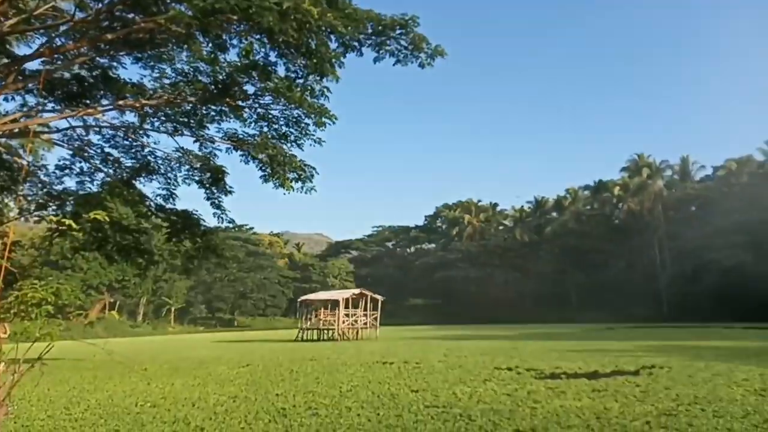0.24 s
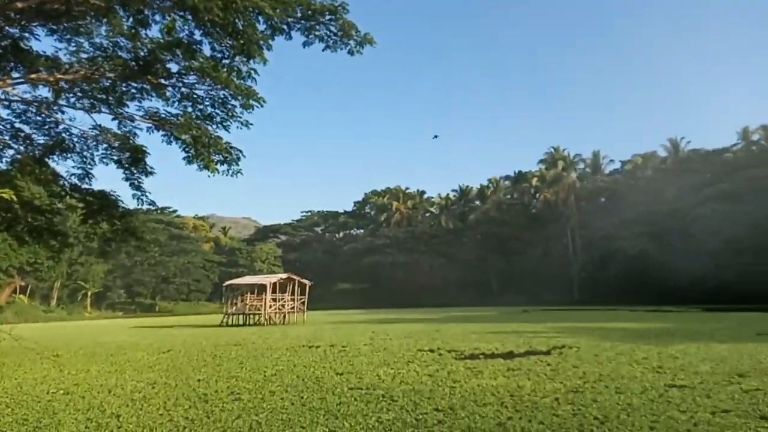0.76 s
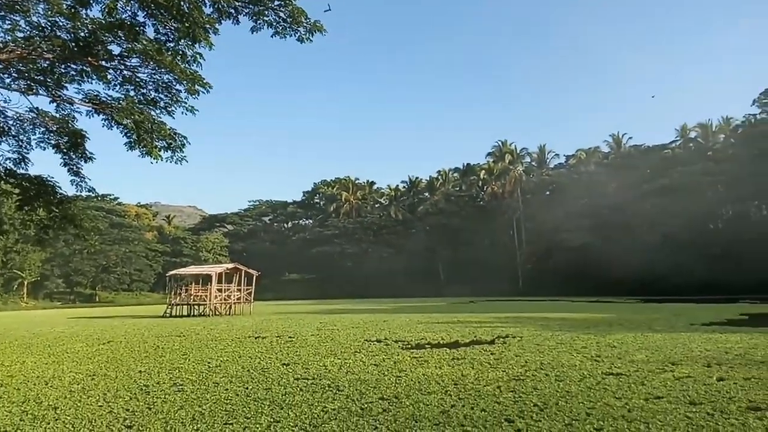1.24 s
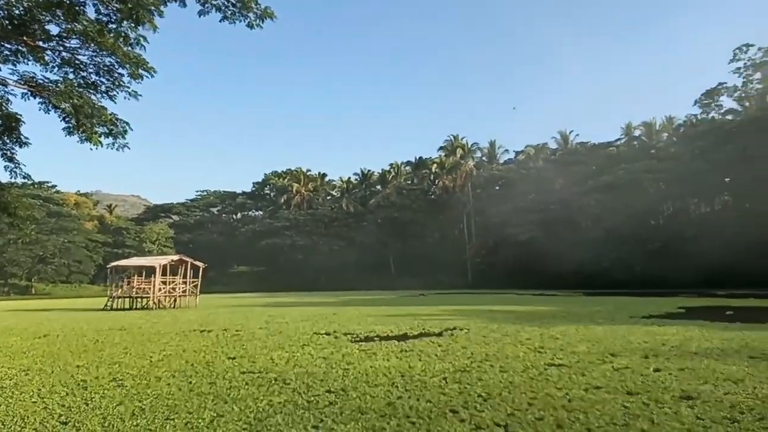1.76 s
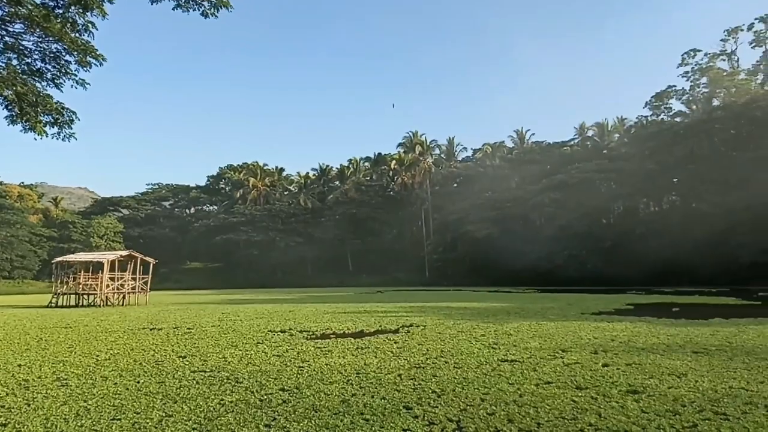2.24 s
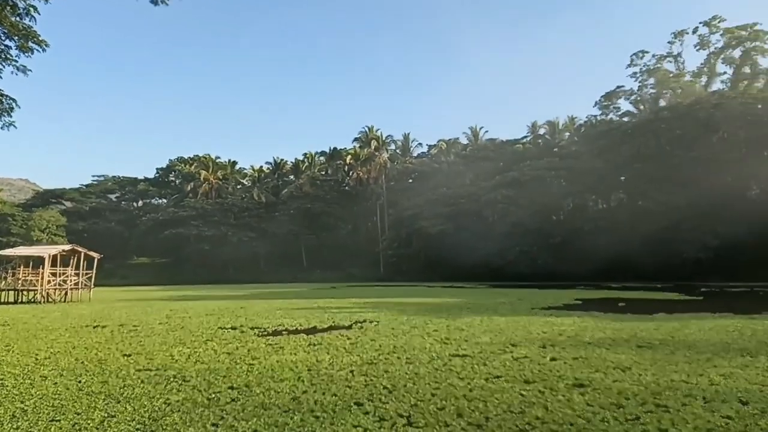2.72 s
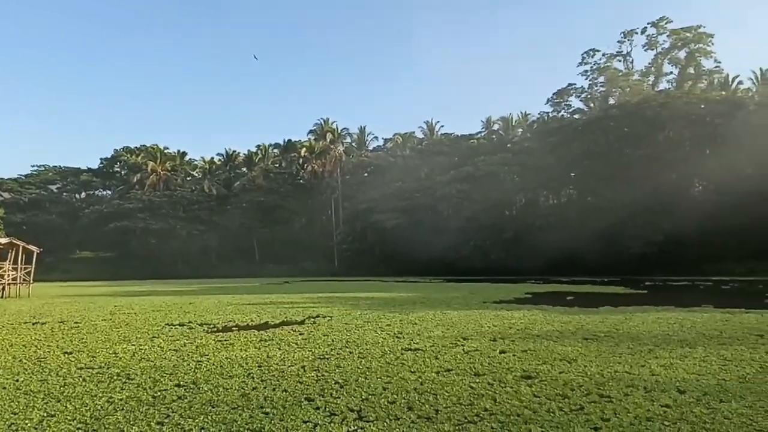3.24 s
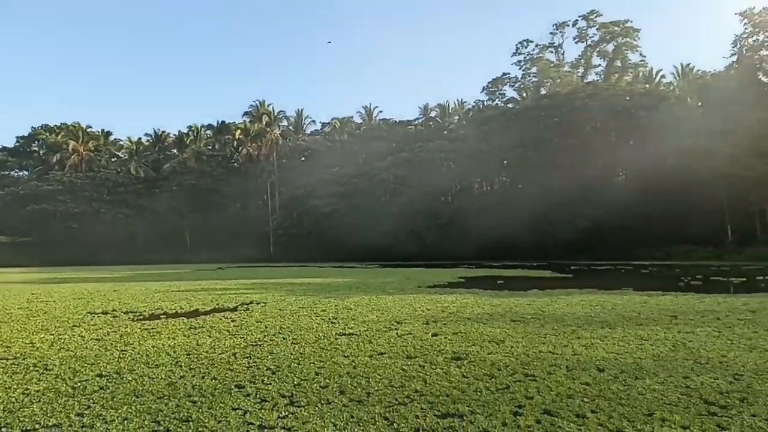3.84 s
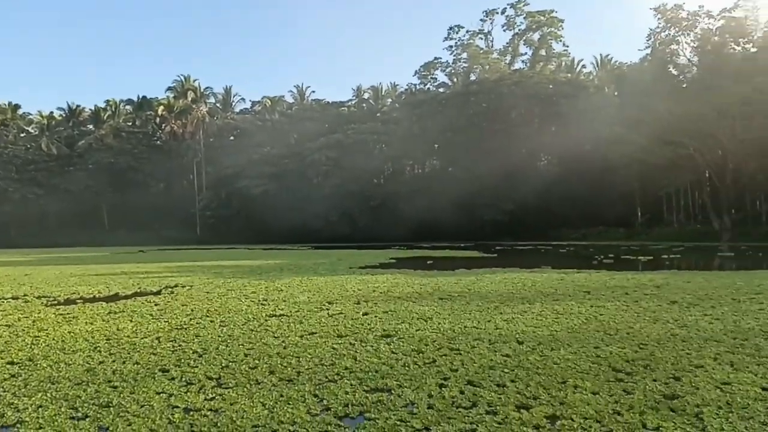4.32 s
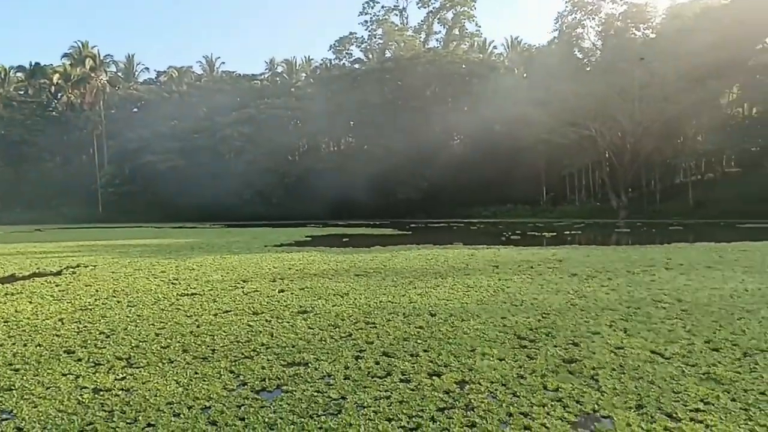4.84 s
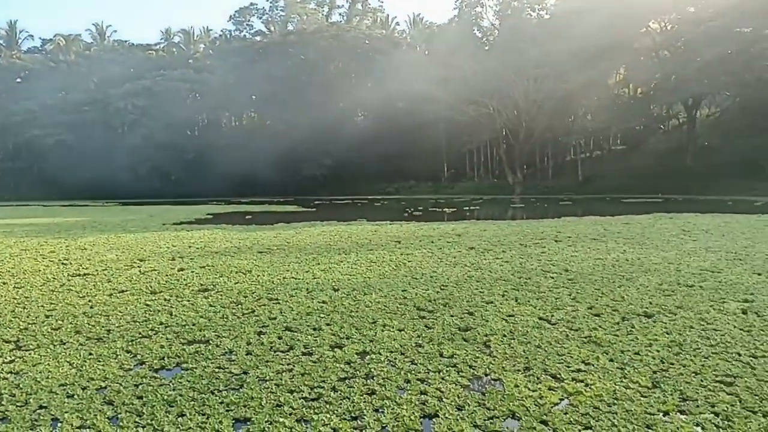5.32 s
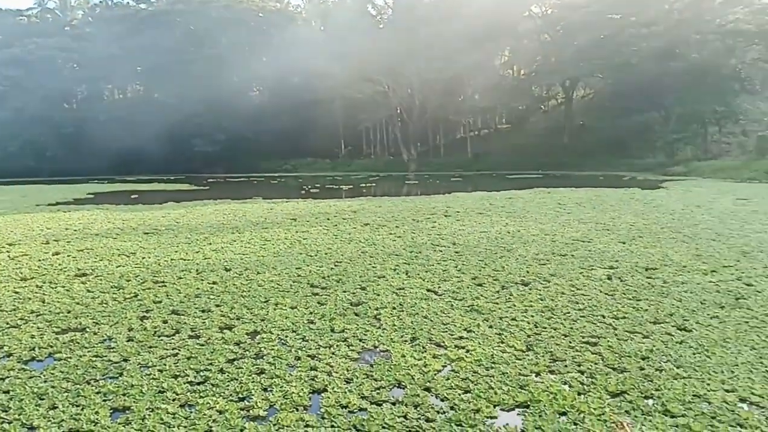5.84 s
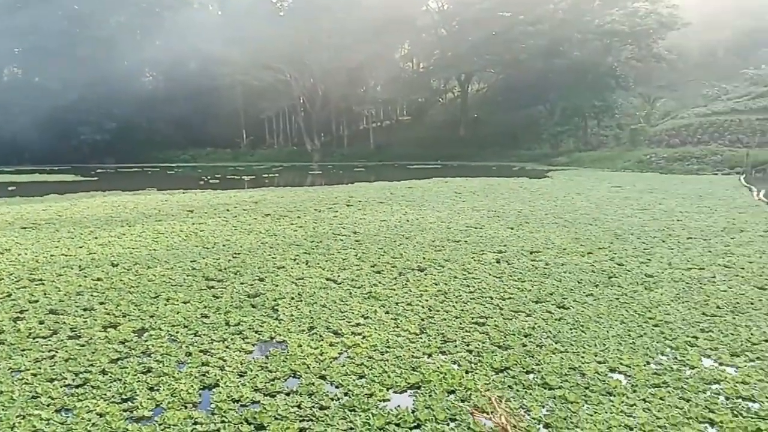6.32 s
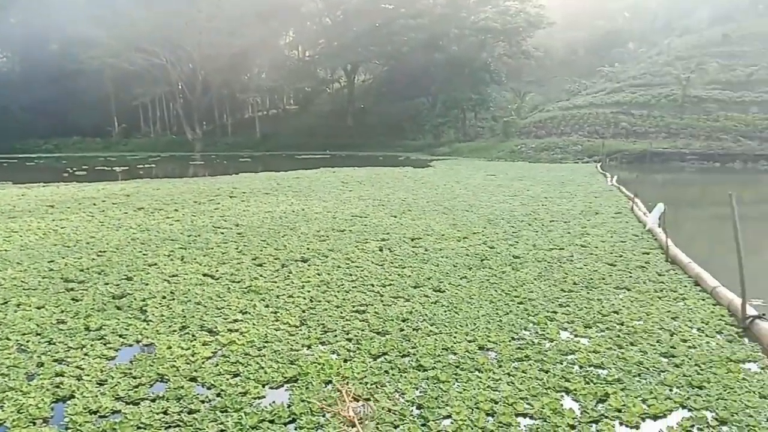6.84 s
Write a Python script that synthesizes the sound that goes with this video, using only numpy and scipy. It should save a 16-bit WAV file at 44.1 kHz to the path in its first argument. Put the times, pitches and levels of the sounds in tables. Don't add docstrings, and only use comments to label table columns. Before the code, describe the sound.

Hollow steps on loose wooden slats for nearly three seconds, then chirping birds, soft clucks, a sharp stick crack and far roosters crowing.

```python
import sys
import numpy as np
from scipy import signal
from scipy.io import wavfile
from scipy.ndimage import uniform_filter1d

SR = 44100
rng = np.random.default_rng(int(sys.argv[2]) if len(sys.argv) > 2 else 0)


def store_wav(level_fs):
    pcm = np.round(np.clip(np.atleast_2d(level_fs), -1, 1) * 32767)
    wavfile.write(sys.argv[1], SR, pcm.T.astype(np.int16))


def ratio(d):
    e = np.asarray(d, float) / 20
    return 10 ** e


N = 311787
DECK_S = 3.5


def evened(x):
    return x / np.sqrt(np.mean(x ** 2) + 1e-20)


def read(points, hz):
    f, value = np.transpose(points)
    return np.interp(np.log(hz + 1), np.log(f + 1), value)


def curve(rows, column=1):
    rows = np.array(rows)
    return np.interp(np.arange(N) / SR, rows[:, 0], rows[:, column])


def add(mix, s, sound):
    at = round(s * SR)
    part = mix[max(at, 0):max(at + len(sound), 0)]
    part += sound[max(-at, 0):][:len(part)]


def resonate(x, hz, width):
    r = np.exp(-np.pi * width / SR)
    return 2 * signal.lfilter([1 - r], [1, -r * np.exp(2j * np.pi * hz / SR)], x).real


def band(x, hz, width):
    return resonate(resonate(x, hz, width), hz, width)


def wander(count, span_s):
    size = max(int(span_s * SR), 2)
    smooth = uniform_filter1d(rng.standard_normal(count), size)
    return evened(uniform_filter1d(smooth, size))


def causal(points):
    level_db = np.maximum(read(points, abs(np.fft.fftfreq(4096, 1 / SR))), -90)
    log_gain = np.log(ratio(level_db))
    return np.fft.ifft(np.exp(np.conj(signal.hilbert(log_gain)))).real[:1024]


def trees(x, t60):
    t = np.arange(SR // 2) / SR
    signs = rng.choice([-1., 1.], len(t))
    sparse = rng.random(len(t)) < .05
    echoes = signs * sparse * ratio(-60 * t / t60) * (t > .008)
    return signal.oaconvolve(x, echoes / np.linalg.norm(echoes))[:N]


def whistles(rows, flutter_db, waver, edge, waver_s=0.0046):
    out = np.zeros(N)
    flutter = wander(N + SR, 0.0045)
    drift = wander(N + SR, waver_s)
    for k, (s, length, *hz, db) in enumerate(rows):
        u = np.linspace(0, 1, int(length * SR))
        start = k * 7919 % N
        own = slice(start, start + len(u))
        bend = hz[0] * (1 - u) * (1 - 2 * u) + 4 * hz[1] * u * (1 - u) + hz[2] * u * (2 * u - 1)
        pitch = bend * (1 + waver * drift[own])
        shape = signal.windows.tukey(len(u), np.clip(edge, 0, 1)) * ratio(db + flutter_db * flutter[own])
        add(out, s, np.sqrt(2) * shape * np.sin(2 * np.pi * np.cumsum(pitch) / SR))
    return out


def arched(rows, depth):
    return [(s, n, hz * (1 - depth), hz, hz * (1 - depth), db) for s, n, hz, db in rows]


# (frequency [Hz], level per Hz [dB])
AIR_COLOUR = [(15, -34), (25, -9), (38, -12), (110, -1.5), (305, -13.5), (1020, -15.5), (1410, -8),
              (2060, -3), (4730, -10), (6190, -27.5), (7280, -8), (8100, -16), (10000, -20.5),
              (11500, -36.5), (15400, -35.5)]
# (time [s], level [dB])
FARM_MURMUR = [(0, -1), (.5, -0.5), (.9, -0.5), (1.3, -3.5), (1.75, -6), (2.1, 2), (2.28, -7), (2.55, -4),
               (2.9, 1.5), (3.4, -0.5), (4.1, -1.5), (4.7, -3), (5.3, 1), (5.6, 1.5), (6.1, 0.5), (6.6, 4),
               (7.07, 4.5)]


def air():
    patchy_db, murmur_hz, murmur_octaves = 3.2, 850, 1.3
    a, b, patches = rng.standard_normal((N // 256 + 5, 513, 3)).T
    patches = uniform_filter1d(patches, size=10, axis=0)
    patches = evened(uniform_filter1d(patches, size=14, axis=1))
    hz = np.fft.rfftfreq(1024, 1 / SR)[:, None]
    swell_db = np.interp(np.arange(a.shape[1]) * 256 / SR, *np.transpose(FARM_MURMUR))
    murmur_db = np.exp(-(np.log2((hz + 1) / murmur_hz) / murmur_octaves) ** 2) * swell_db
    patch_db = patchy_db * patches / (1 + (hz / 4000) ** 2)
    z = (a + 1j * b) * ratio(read(AIR_COLOUR, hz) + murmur_db + patch_db)
    return ratio(-62.5) * evened(signal.istft(z, nperseg=1024, noverlap=768)[1][:N])


# (time [s], level [dB], extra level of its high voices [dB])
FLOCK_LEVELS = [(0.0, -69, 5), (0.39, -62, 4.5), (0.94, -65, 0.5), (2.24, -61, 0.5), (2.81, -55, 7),
                (2.97, -58, 3), (3.17, -68.5, 11), (3.62, -63.5, -18), (3.96, -63.5, -4),
                (4.19, -53.5, -0.5), (4.53, -62, 11.5), (4.98, -60, -5), (5.57, -55.5, -3),
                (5.93, -60, -2.3), (7.07, -50.5, -10.5)]
# (frequency [Hz], level per Hz [dB])
FLOCK_VOICES = [(650, -48), (1100, -23), (1400, -13), (2070, 2.5), (3070, 1.5), (4050, -2), (4750, -17),
                (5200, -30), (6760, -47), (11400, -120)]


def flock():
    s, length, place, bend, size = rng.random((1100, 5)).T
    hz = 1350 * (4200 / 1350) ** place
    high_db = curve(FLOCK_LEVELS, column=2)[(s * N).astype(int)] * (2 * place - 1)
    db = read(FLOCK_VOICES, hz) + high_db + 4 * size
    first_hz = hz * (1.08 - 0.1603 * bend)
    last_hz = hz * (.92 + 0.158 * bend)
    rows = np.transpose([s * N / SR, .025 + .07 * length ** 2, first_hz, hz, last_hz, db])
    notes = whistles(rows, flutter_db=6, waver=0.0097, edge=0.44)
    return ratio(curve(FLOCK_LEVELS) - 2) * evened(.15 * notes + trees(notes, .6))


# (time [s], length [s], middle pitch [Hz], level [dB])
RISING_NOTES = [(.04, 0.065, 2800, -65), (0.109, .09, 3060, -63), (0.236, 0.083, 3210, -65.5),
                (0.403, .08, 2620, -68), (0.476, .1, 2800, -58.5), (.6, .13, 1150, -77),
                (2.82, .15, 1240, -71.5), (2.802, .18, 3056, -54.5), (4.954, .26, 3103, -58),
                (5.25, 0.26, 2700, -59), (6.973, 0.09, 3290, -62)]
# (time [s], length [s], middle pitch [Hz], fall [Hz], level [dB])
FALLING_NOTES = [(-.01, 0.062, 1547, 180, -61), (0.274, 0.095, 1760, 490, -59.5),
                 (0.371, 0.15, 1323, 362, -69), (.935, .07, 3990, 300, -63), (1.117, .07, 3580, 300, -66),
                 (1.2, .075, 3620, 250, -62), (1.29, .06, 2650, 350, -63), (1.349, .1, 2330, 250, -67),
                 (1.8, .12, 2570, 80, -63.5), (1.799, 0.11, 3430, 100, -70), (2.53, 0.062, 3520, 150, -62),
                 (1.554, 0.098, 1750, 230, -66.5), (2.86, .19, 3670, 110, -54.5),
                 (3.42, .05, 1890, 80, -66), (3.465, .14, 1739, 200, -58), (3.598, 0.072, 1530, 150, -64),
                 (3.67, 0.064, 3080, 250, -63.5), (3.845, 0.13, 1740, 110, -64.5),
                 (4.059, 0.16, 2790, 210, -64), (4.741, 0.064, 3480, 201, -60.5),
                 (4.8, .09, 3300, 100, -67), (4.929, .1, 1600, 120, -67.5), (5.44, .12, 1350, 300, -66),
                 (5.481, 0.069, 1653, 252, -60), (6.282, 0.08, 1650, 230, -63.5),
                 (6.816, 0.082, 1790, 130.3, -54.5)]
# (time [s], length [s], pitch
# [Hz], level [dB])
HELD_NOTES = [(.811, .135, 4150, -62), (1.047, 0.058, 2960, -64.5), (1.4, .05, 3550, -67),
              (1.355, 0.045, 3760, -67), (1.17, .1, 3080, -74), (4.66, 0.083, 3660, -64.5),
              (1.59, 0.213, 2660, -62), (1.56, .24, 3540, -69.5), (1.64, 0.24, 1760, -68.5),
              (2.02, .17, 3080, -68), (1.958, 0.19, 3670, -62), (2.007, 0.176, 4310, -71.5),
              (2.465, .065, 3680, -66), (3.92, .049, 2960, -65.5), (4.29, 0.083, 3220, -57.5),
              (5.52, 0.11, 2290, -64), (5.522, .12, 2600, -57.5), (6.393, 0.2, 3620, -71),
              (4.385, .06, 3230, -67), (1.31, .07, 4430, -69)]


def songs():
    rise_hz_per_s, bow, sag = 1550, 0.0123, 0.012
    notes = []
    for s, n, hz, db in RISING_NOTES:
        half_rise = rise_hz_per_s * n / 2
        notes.append((s, n, hz * (1 - bow) - half_rise, hz, hz * (1 - bow) + half_rise, db))
    for s, n, hz, fall, db in FALLING_NOTES:
        notes.append((s, n, hz + fall / 2, hz, hz - fall / 2, db))
    for s, n, hz, db in HELD_NOTES:
        notes.append((s, n, hz, hz, hz * (1 - sag), db))
    return whistles(notes, flutter_db=2.6, waver=.004, edge=.3)


# (time [s], level [dB])
CRICKET_TRIPLETS = [(2.971, -67), (3.217, -67), (3.458, -65), (3.702, -65.5), (5.63, -72), (5.879, -66),
                    (6.124, -64.5), (6.366, -67.5), (6.607, -64), (6.883, -62)]
# ((pitch [Hz], width [Hz], pulse rate [1/s]), [(time [s], length [s], level [dB]), ..])
INSECT_TRILLS = [
    ((9240, 120, 68), [(.42, 0.41, -84), (1.45, 0.38, -82.5), (2.33, 0.44, -83.5), (3.3, 0.45, -87), (4.27, .4, -76.5), (5.25, .4, -81.5), (6.1, 0.51, -82)]),
    ((10100, 330, 90), [(4.55, 0.89, -83.5), (6.3, 1, -80.5)]),
    ((10850, 150, 80), [(4.85, 1.1, -93)]),
    ((8600, 200, 16), [(2.9, 2, -84.5)]),
    ((7260, 350, 32), [(0.00065, 6.4, -79.5)]),
    ((4810, 310, 90), [(0.001, 7.1, -82.5)]),
]


def crickets():
    gap_s = .0352
    rows = [(s + k * gap_s, .018, 4750, 4480, 4150, db) for s, db in CRICKET_TRIPLETS for k in range(3)]
    out = whistles(rows, flutter_db=-2.5, waver=0.0046, edge=0.93)
    for (hz, width, rate), trills in INSECT_TRILLS:
        for s, length, db in trills:
            t = np.arange(int(length * SR)) / SR
            beat = np.pi * rate * t + 0.31 * wander(len(t), 0.098)
            strokes = np.maximum(np.sin(beat) ** 2 - .2, 0)
            wing = band(rng.standard_normal(len(t)), hz, width)
            fade = signal.windows.tukey(len(t), min(0.18 / length, 1))
            add(out, s, ratio(db) * evened(strokes * wing) * fade)
    return out


# (time [s], width [s], level [dB])
BREEZE_GUSTS = [
    (.15, 0.19, -68),
    (.87, .1, -62.5),
    (1.5, 0.14, -64),
    (2.2, 0.24, -68),
    (2.9, 0.13, -68),
    (5.7, 0.38, -70),
    (6.88, 0.14, -64.5),
]


def breeze():
    low = band(rng.standard_normal(N), 104.7, 82)
    t = np.arange(N) / SR
    calm = ratio(-78.5)
    gusts = calm + sum(ratio(db) * np.exp(-((t - s) / width) ** 2) for s, width, db in BREEZE_GUSTS)
    return gusts * ratio(3.5 * wander(N, .04)) * evened(low)


# (time [s], peak level [dB], pitch [Hz], time to fall 60 dB [s])
DECK_THUMPS = [(.133, -40.5, 93.2, 0.57), (.135, -37.5, 269.6, 0.31), (.141, -45.5, 176.8, 0.64),
               (.269, -50.5, 111, 0.44), (.741, -42, 150, 0.46), (.745, -37, 234, 0.22),
               (0.759, -50, 420, 0.25), (1.145, -31, 179.7, 0.26), (1.15, -37, 92, 0.4),
               (1.15, -42.5, 320, 0.27), (1.345, -39, 175, 0.23), (1.345, -44.5, 90, 0.43),
               (2.0, -40, 217.4, 0.5), (2.01, -48, 397, 0.48), (2.38, -54, 340, 0.36),
               (2.42, -52.5, 128, .23), (2.685, -43, 396, 0.27)]


def thumps():
    out, t = np.zeros(N), np.arange(SR // 2) / SR
    swell = np.sin(np.pi / 2 * np.minimum(t / .011, 1)) ** 2
    for s, db, hz, t60 in DECK_THUMPS:
        share = np.clip(0.57 - 0.04 * (db + 42) + .12 * np.log2(hz / 180), 0, 1)
        shaken = band(rng.standard_normal(len(t)), hz, 1.45 * hz)
        shaken = evened(band(shaken, hz, 1.45 * hz))
        clean = np.sqrt(2) * np.sin(2 * np.pi * hz * t)
        tone = (1 - share) * clean + share * shaken
        add(out, s, ratio(db - 60 * t / t60) * swell * tone)
    return out


# (time [s], peak level [dB], pitch [Hz])
SLAT_TAPS = [(.144, -41, 1900), (.1512, -40.5, 2110), (.1544, -40, 1880), (.7502, -46, 1880),
             (.7769, -42, 1710), (.7845, -42, 1760), (.7894, -40, 2150), (.7941, -39, 1760),
             (.7972, -38, 1770), (.8058, -43, 1920), (.9689, -49, 2510), (.9719, -48, 2760),
             (.9798, -49, 2270), (1.158, -50, 1000), (1.4539, -44, 2130), (1.4573, -41, 2000),
             (1.535, -50.5, 1050), (1.5407, -47, 2090), (1.8034, -44, 2130), (1.8104, -42, 2350),
             (1.8138, -43, 1950), (1.8196, -43, 2070), (1.9386, -35, 2450), (1.9455, -38, 2250),
             (1.9492, -40, 1880), (1.9923, -38, 2240), (1.9963, -34.5, 2300), (1.9994, -37, 2620),
             (2.0038, -40, 1700), (2.0084, -43, 1610), (2.3539, -31, 2180), (2.3601, -35, 2210),
             (2.3647, -29, 2350), (2.3685, -37, 1870), (2.3759, -35, 1880), (2.3826, -38, 1790),
             (2.4283, -35, 2160), (2.434, -39, 1800), (2.583, -47.5, 1070), (2.6577, -25, 2100),
             (2.659, -31, 1025), (2.6614, -24, 2170), (2.663, -29, 3100), (2.6667, -30, 1970),
             (2.6712, -30, 2180), (2.6746, -30, 1930), (2.6808, -34, 1630), (2.6865, -34, 2010),
             (2.6995, -30, 2100), (2.7034, -31, 2060), (2.7089, -34, 1830), (2.7177, -33, 2250),
             (2.7226, -34, 2400), (2.7355, -34, 1870)]


def taps():
    out = np.zeros(int(DECK_S * SR))
    cycles = 1.6
    for s, db, hz in SLAT_TAPS:
        u = np.arange(600) / SR * hz / cycles
        add(out, s - cycles / hz, ratio(db) * u * np.exp(1 - u) * np.sin(2 * np.pi * cycles * u))
    return out


# (time [s], peak level [dB], time to fall 60 dB [s], level of hollow part [dB])
SLAT_RATTLES = [(0.142, -32.5, 0.16, 2), (.159, -43, 0.35, -12), (.705, -48, 0.11, -25),
                (.747, -37, 0.24, -4), (.774, -37, 0.21, -10), (0.795, -38.5, 0.22, -23),
                (0.88, -51, 0.26, -28), (.966, -50, 0.16, -32), (1.16, -43.5, 0.22, -14),
                (1.454, -41, 0.23, -40), (1.531, -44, .15, -30), (1.8025, -39, .2, -30),
                (1.82, -48, .35, -4), (1.915, -47, 0.16, -30), (1.938, -31.5, 0.18, -20),
                (1.9913, -32, .2, -40), (2.006, -41, .65, -5), (2.342, -41, 0.11, -30),
                (2.353, -29.5, 0.2, -30), (2.364, -31, .14, -16), (2.426, -31, 0.17, -13.5),
                (2.521, -47, 0.23, -28), (2.585, -45, 0.4, -8), (2.595, -43, 0.43, -18),
                (2.6564, -19, 0.19, -32), (2.697, -29, 0.2, -28), (2.718, -39, 0.35, -34)]
# (time [s], peak level [dB])
GRIT_SCUFFS = [
    (.705, -61),
    (.747, -50),
]
# (frequency [Hz], width [Hz] to which 120 is added, level [dB])
SLAT_RINGS = [(1037, 25, 4.5), (1360, 28, -10), (1830, 170, 0), (2190, 180, -3), (2530, 66, 2),
              (2870, 45, -8), (3300, 30, 2), (3700, 50, -9)]
# (frequency [Hz], level per Hz [dB])
KNOCK_COLOUR = [(290, -31), (500, -14), (800, -12), (1050, -4), (1140, -1.5), (2170, 1.5), (3410, -8),
                (5700, -33), (9380, -42), (15000, -92)]


def rattles():
    knocks, hollow, bright = np.zeros((3, int(DECK_S * SR)))
    strengths = ratio(2 * np.minimum(rng.exponential(1, N), 3))
    grains = strengths * (rng.random(N) < .3)
    chatter = evened(rng.standard_normal(N) * grains * ratio(1.6 * wander(N, .003)))
    t = np.arange(SR // 2) / SR
    for s, db, t60, hollow_db in SLAT_RATTLES:
        own = chatter[round(s * SR):][:len(t)]
        burst = 0.13 * own * ratio(-60 * t / t60) * np.minimum(t / 0.00096, 1)
        burst[0] += .3
        add(knocks, s, ratio(db) * burst)
        add(hollow, s, ratio(db + hollow_db) * burst * np.minimum(t / 0.016, 1))
        add(bright, s, ratio(-58 + .3 * db) * burst)
    for s, db in GRIT_SCUFFS:
        add(bright, s, ratio(db - 60 * t / 0.19) * .18 * chatter[round(s * SR):][:len(t)])
    broad = causal(KNOCK_COLOUR)
    broad_part = signal.oaconvolve(knocks, broad / abs(broad).max())[:len(knocks)]
    rings = sum(ratio(db) * band(knocks, hz, width + 120) for hz, width, db in SLAT_RINGS)
    hollow_part = band(band(hollow, 440, 420), 440, 420) + ratio(-6) * band(hollow, 850, 700)
    bright_part = band(band(bright, 5200, 2700), 5200, 2700)
    deck = ratio(-4.5) * broad_part + ratio(4.0) * rings
    deck = deck + ratio(24.0) * hollow_part + ratio(7.5) * bright_part + taps()
    return np.pad(deck, (0, N - len(deck)))


# (time [s], length [s], start pitch [Hz], end pitch [Hz], level [dB])
PEEP_SWEEPS = [(5.96, .045, 8470, 7400, -64.5), (3.27, 0.055, 8150, 7500, -71.5),
               (4.432, .02, 4400, 3800, -63), (4.225, 0.073, 2850, 3200, -63),
               (4.12, 0.045, 3350, 4050, -64), (4.48, .045, 3500, 4030, -59),
               (4.482, 0.071, 3910, 4140, -62.5), (5.72, 0.0643, 3200, 3750, -61.5),
               (3.82, .035, 1750, 1430, -60), (6.57, .08, 1800, 1950, -60), (4.34, .05, 1930, 1520, -60.5),
               (4.16, 0.039, 2030, 2600, -57), (4.18, 0.061, 2650, 2250, -53.5),
               (4.195, .07, 2190, 2040, -57), (3.6, 0.034, 1940, 2190, -56),
               (3.685, 0.0294, 2200, 1700, -62), (3.985, .03, 2050, 2300, -57),
               (2.215, .06, 2850, 3500, -62), (2.26, .09, 3250, 3650, -64), (2.25, .09, 3500, 4150, -64),
               (4.005, .05, 2920, 2640, -47), (3.99, .015, 2800, 2900, -60), (6.57, .05, 1400, 1900, -64),
               (6.885, 0.031, 1720, 1480, -65), (4.452, .03, 3600, 2900, -65), (4.55, .08, 4150, 3850, -67),
               (6.76, .06, 2300, 1880, -65), (2.3, .05, 3700, 4100, -64), (5.84, .04, 3950, 4300, -68)]
# (time [s], length [s], top pitch [Hz], level [dB])
PEEP_ARCHES = [
    (4.12, 0.063, 4120, -64),
    (3.628, 0.0555, 2420, -52.5),
    (6.6, 0.161, 2420, -62.5),
]
# (time [s], level [dB])
PEEP_CHIPS = [(2.86, -58), (2.945, -62), (3.11, -61), (3.195, -61.5), (3.345, -63), (3.43, -61)]


def peeping():
    chip_s, chip_hz, fall_hz = 0.0197, 2059, 140
    sweeps = [(s, n, a, (a + b) / 2, b, db) for s, n, a, b, db in PEEP_SWEEPS]
    chips = [(s, chip_s, chip_hz + fall_hz / 2, chip_hz, chip_hz - fall_hz / 2, db) for s, db in PEEP_CHIPS]
    notes = sweeps + arched(PEEP_ARCHES, depth=.059) + chips
    return whistles(notes, flutter_db=2.5, waver=.02, edge=.4, waver_s=.0012)


# (time [s], peak level [dB], contact pitch [Hz], contact length [ms], ringing level [dB])
STICK_CONTACTS = [
    (5.8326, -31, 2650, 1.37, -22),
    (6.2273, -15.5, 2610, 0.82, -0.5),
    (6.2278, -22, 3000, 0.56, -18),
    (6.2282, -25, 427, 2.86, -7),
    (6.2343, -29.5, 1740, 1.64, -16),
    (2.6565, -52, 12000, .3, -18),
]
# (frequency [Hz], level [dB], ring time [s], of which 0.32, at most 0.05 s,
# is the fall by 60 dB)
STICK_RINGS = [(288, -33, 0.13), (516, -9, 0.048), (1320, -7, 0.068), (1570, -1, 0.055), (1990, 4.5, 0.017),
               (3000, -20, 5.0), (3395, -14, 0.1), (3860, -8.5, 0.046), (4587, -36, 0.079)]


def stick():
    out, t = np.zeros(N), np.arange(4000) / SR
    ring = np.zeros(len(t))
    for hz, level, t60 in STICK_RINGS:
        ring += ratio(level - 60 * t / min(0.32 * t60, .05)) * np.sin(2 * np.pi * hz * t)
    for s, db, hz, ms, ring_db in STICK_CONTACTS:
        u = np.arange(int(ms * SR / 1000)) / SR
        contact = np.hanning(len(u)) * np.cos(2 * np.pi * hz * (u - u.mean()))
        rung = np.convolve(contact, ring)[:len(t)]
        splinter = 0.018 * rng.standard_normal(len(t)) * ratio(-60 * t / 0.04)
        add(out, s, ratio(db) * contact)
        add(out, s, ratio(db + ring_db) * (rung / abs(rung).max() + splinter))
    out = signal.sosfilt(signal.butter(2, 160, "high", fs=SR, output="sos"), out)
    return out + ratio(-15.0) * trees(out, 0.096)


# (time [s], length [s], top pitch [Hz], level [dB])
HEN_CLUCKS = [(2.89, .1, 521, -76), (3.02, .1, 520, -76.5), (3.035, 0.057, 745, -73),
              (3.15, 0.045, 750, -75), (3.33, .08, 721, -77.5), (3.813, .14, 722, -74),
              (4.332, .14, 697, -63.5), (4.92, 0.12, 735, -65.5), (5.415, .11, 743, -68),
              (5.914, 0.092, 697, -63.5), (6.254, .056, 754, -64.5), (6.352, 0.125, 746, -64.5),
              (6.82, 0.12, 760, -68), (6.88, .14, 890, -72)]


def hens():
    return whistles(arched(HEN_CLUCKS, depth=.03), flutter_db=2.1, waver=.06, edge=.7)


# (time [s], pitch [Hz], level [dB])
ROOSTER_CROW = [
    (5.3, 965, -70),
    (5.5, 975, -62),
    (5.75, 1006, -56),
    (5.86, 996, -59.5),
    (6.0, 985, -60),
    (6.17, 966, -59.5),
    (6.4, 956, -60),
    (6.5, 966, -62),
    (6.56, 950, -70),
]
# (multiple of the pitch, level [dB])
ROOSTER_TONES = [
    (1, -20),
    (2, 0),
    (3, -17),
]


def rooster():
    turns = np.cumsum(curve(ROOSTER_CROW) * (1 + .011 * wander(N, .003))) / SR
    voice = np.zeros(N)
    for k, db in ROOSTER_TONES:
        voice += ratio(db + 3.5 * wander(N, .011)) * np.sin(2 * np.pi * k * turns)
    t = np.arange(N) / SR
    start, end = ROOSTER_CROW[0][0], ROOSTER_CROW[-1][0]
    sounding = np.clip(np.minimum(t - start, end - t) / 0.014, 0, 1)
    break_db = -9 * np.exp(-((t - 6.34) / .02) ** 2)
    return ratio(curve(ROOSTER_CROW, column=2) + break_db) * voice * sounding


# (time [s], length [s], top pitch [Hz], level [dB])
FAR_ROOSTER_CROW = [
    (5.5, 0.74, 990, -70.5),
    (6.24, .22, 985, -71.5),
    (6.56, 0.18, 964, -72.5),
]


def far_rooster():
    return whistles(arched(FAR_ROOSTER_CROW, .015), flutter_db=4, waver=.022, edge=.15, waver_s=.006)


def scene():
    birds = songs()
    deck = rattles()
    peeps = peeping()
    fowl = hens() + rooster() + far_rooster()
    far = flock() + crickets()
    far = far + birds + ratio(-7.5) * trees(birds, 0.42)
    far = far + peeps + ratio(-7.0) * trees(peeps, 0.25)
    far = far + fowl + ratio(-2.5) * trees(fowl, 0.24)
    near = deck + ratio(-8.0) * trees(deck, 0.31) + thumps() + stick()
    return (air() + far + breeze() + near)[None]


def top_cut(x):
    return signal.sosfilt(signal.butter(12, 15600, fs=SR, output="sos"), x)


def record(dry):
    no_top = signal.sosfilt(signal.ellip(8, .5, 60, 15550, fs=SR, output="sos"), dry)
    mix = signal.sosfilt(signal.butter(2, 45, "high", fs=SR, output="sos"), no_top)
    return top_cut(mix)


dry = scene()
out = record(dry)
store_wav(out)
```